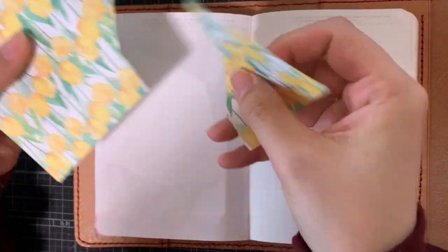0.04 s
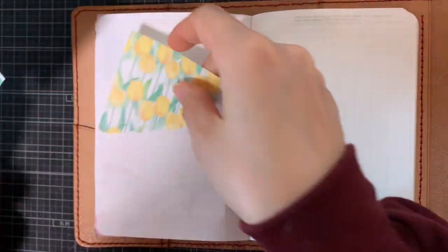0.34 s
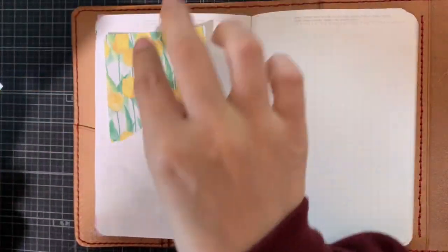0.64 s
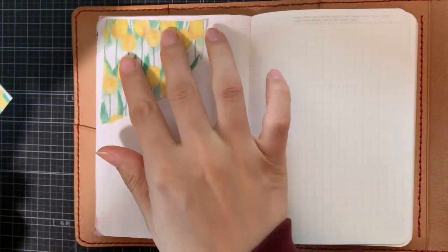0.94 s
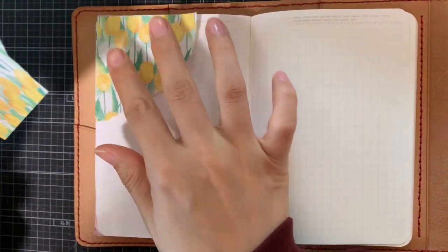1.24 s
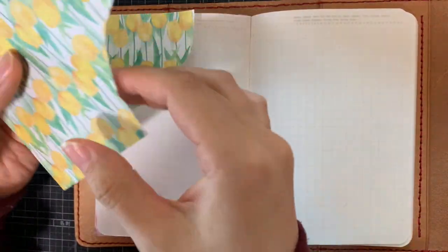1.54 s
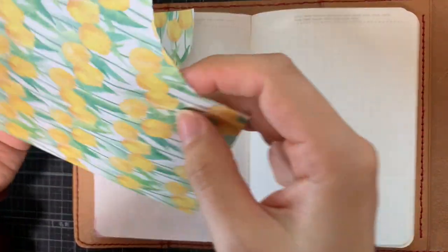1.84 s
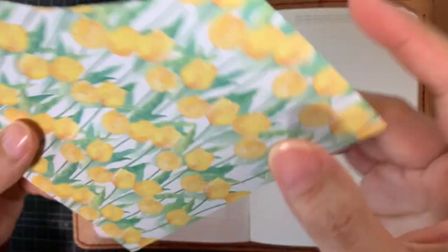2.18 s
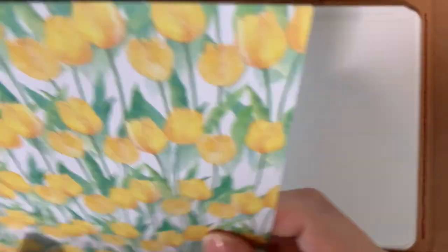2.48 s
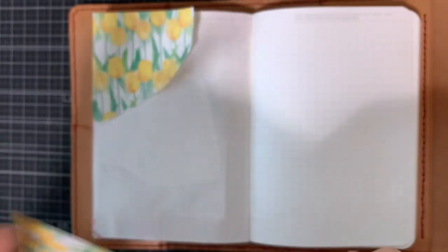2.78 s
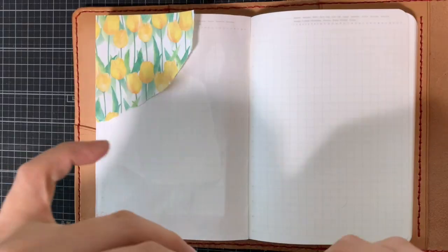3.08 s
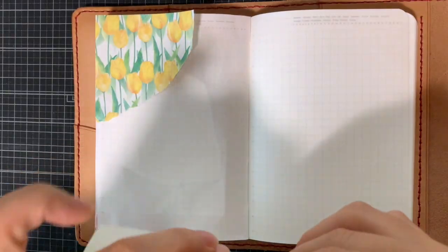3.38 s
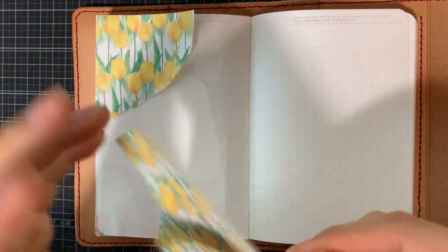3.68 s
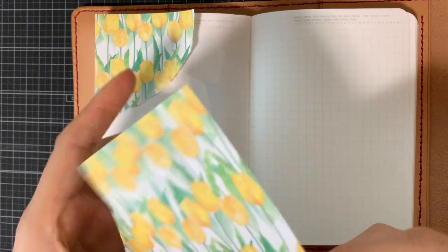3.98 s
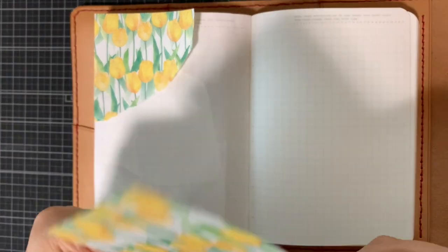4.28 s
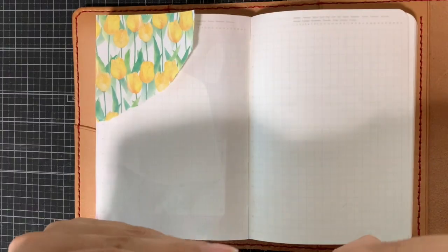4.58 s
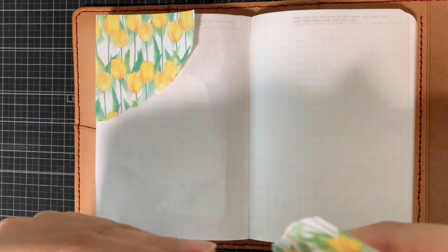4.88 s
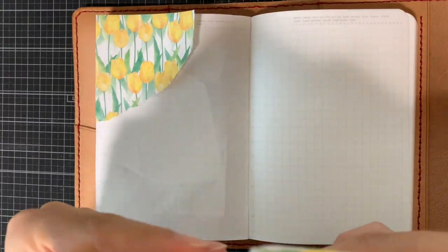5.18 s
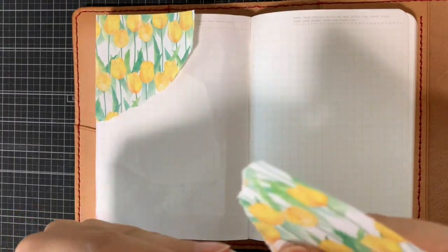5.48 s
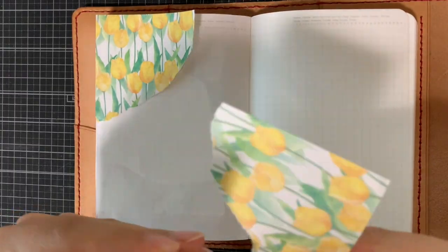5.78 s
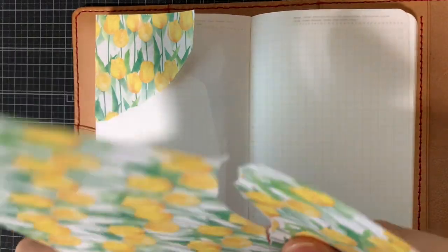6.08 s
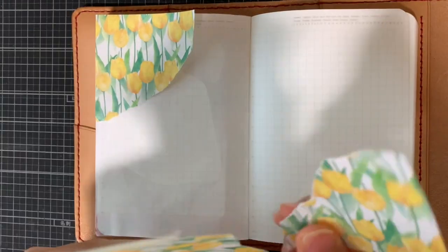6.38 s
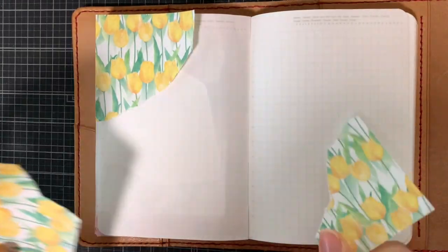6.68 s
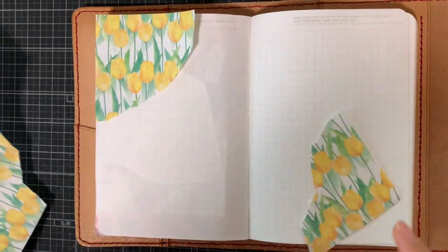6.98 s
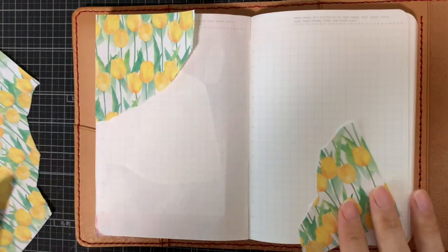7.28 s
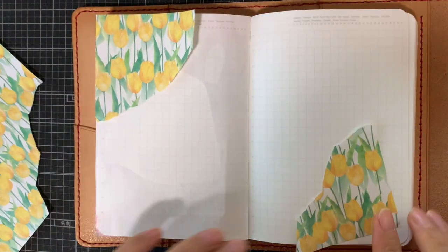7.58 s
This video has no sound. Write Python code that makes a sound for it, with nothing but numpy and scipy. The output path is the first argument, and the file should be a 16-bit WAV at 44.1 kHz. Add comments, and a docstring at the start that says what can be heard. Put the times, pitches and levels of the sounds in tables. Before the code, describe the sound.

Thin paper slides and crinkles under fingers, is dragged along, then torn in short pulls over a notebook in a quiet room.

```python
"""Thin paper is handled over an open notebook, close to a camera in a small, quiet room.
First fingers slide on the sheet, which ticks and pops as it buckles, and smooth a scrap onto the page.
From 2 s the sheet bends and flutters, with a dull bump; near 3.4 s it is dragged along and a hand
presses on the book. From 4.6 to 6.4 s it is torn in short pulls, its fibres breaking in clumps with
a few sharp snaps. Last, fingers smooth scraps down again and a hand bumps softly on the book."""
import sys
import numpy as np
from scipy import signal
from scipy.fft import rfft, irfft, next_fast_len
from scipy.io import wavfile
from scipy.ndimage import uniform_filter1d, map_coordinates

SR = 44100
rng = np.random.default_rng(int(sys.argv[2]) if len(sys.argv) > 2 else 0)


def wav_out(sig):
    """Save sig, one row per channel (or a flat mono array), as 16-bit PCM at SR to the path in sys.argv[1]."""
    wavfile.write(sys.argv[1], SR, np.round(np.clip(np.atleast_2d(sig).T, -1, 1) * 32767).astype(np.int16))


N = 341334
TIME = np.arange(N) / SR
FFT_SIZE = next_fast_len(N + SR // 8)
FFT_HZ = np.fft.rfftfreq(FFT_SIZE, 1 / SR) + 1
SPLIT_HZ, TOP_HZ = 7900, 15800  # where the lower and bright bands meet; where the treble ends


def amp(db):
    """Turn decibels into a gain."""
    return 10 ** (np.asarray(db) / 20)


def unit(x):
    """Scale to an average (rms) size of 1."""
    return x / np.sqrt(np.mean(x ** 2) + 1e-20)


def noise():
    """Two unrelated white noises."""
    return rng.standard_normal((2, N))


def wobble(rate):
    """A smooth curve through rate random points a second."""
    return map_coordinates(rng.standard_normal(int(N * rate / SR) + 4), [TIME * rate])


def colour(x, spectrum, band="all"):
    """Shape the tone by a table of relative levels, within the band "all", "lower" or "bright"."""
    size = 4096
    hz = np.fft.rfftfreq(size, 1 / SR) + 1
    f, db = np.transpose(spectrum)
    gain = amp(np.interp(np.log(hz), np.log(f), db)) / np.sqrt(1 + (f[0] / 2 / hz) ** 4)
    outside = {"all": hz / TOP_HZ, "lower": np.sqrt(hz / SPLIT_HZ),
               "bright": np.maximum(SPLIT_HZ / hz, hz / TOP_HZ)}[band]
    gain = gain / np.sqrt(1 + outside ** 40)
    # Make the filter ring after a click, never before it.
    cepstrum = irfft(np.log(np.maximum(gain, gain.max() * 1e-3)))[:size // 2]
    response = irfft(np.exp(rfft(2 * cepstrum, size)))
    return signal.fftconvolve(x, response[None] / np.linalg.norm(response))[:, :N]


def crackle(rate, spread_db, t60, attack):
    """Tiny breaks of random size, rate a second, each dying away by 60 dB in t60 seconds."""
    breaks = (rng.random(N) < rate / SR) * amp(spread_db * np.clip(rng.standard_normal(N), -2, 2))
    t = TIME[:SR // 12]
    fade = amp(-60 * t / t60) * (1 - np.exp(-t / attack))
    power = np.abs(signal.oaconvolve(breaks ** 2, fade ** 2)[:N])
    # The hand feeds in energy steadily, however unevenly it is let go.
    local_power = uniform_filter1d(power, size=1100) + power.mean() / 100
    return noise() * np.sqrt(power / local_power)


def friction(rate, spread_db, t60, hiss_db):
    """Fibres catch, on top of the even hiss of the finest ones."""
    catches = crackle(rate, spread_db, t60, attack=.0005)
    return unit(catches + amp(hiss_db) * noise())


def reshaping(x, depth_db, width=4):
    """As the sheet changes shape its tone drifts, in peaks and dips that last about 80 ms."""
    hz, _, spectra = signal.stft(x, SR, nperseg=512)
    drift = rng.standard_normal(spectra.shape[1:])
    for _ in range(2):  # blur across frequency, then time
        drift = uniform_filter1d(drift, size=width, axis=0)
        drift = uniform_filter1d(drift, size=14, axis=1)
    mobility = np.tanh(hz / 2400)[:, None]  # the lowest tones hardly move
    gain = amp(depth_db * mobility * np.clip(unit(drift), -2, 2))
    # A peak draws its energy from the frequencies beside it.
    gain /= np.sqrt(uniform_filter1d(gain ** 2, size=6 * width, axis=0))
    return signal.istft(spectra * gain, nperseg=512)[1][:, :N]


def effort(start, hold, rise, fall, swell_db=0):
    """One hand movement: up 30 dB in rise seconds, an arch while held, down 30 dB in fall seconds."""
    t = TIME - start
    flanks = np.maximum(-t, 0) / rise + np.maximum(t - hold, 0) / fall
    held = np.clip(t / hold, 0, 1)
    arch_db = 4 * (np.sin(np.pi * held) - 2 / np.pi)
    return amp(arch_db + swell_db * (held - .5) - 30 * np.minimum(flanks, 4))


def movements(rows, rise, fall):
    """The strength over time of several hand movements of one kind."""
    return sum(amp(db) * effort(s, hold, rise, fall) for s, hold, db in rows)


def stroke(fibres, rows, spectrum, rise, fall, swell_db=0):
    """The noise is heard in a lower band and a bright band, split near 8 kHz, each at its own level."""
    lower = sum(amp(db) * effort(s, hold, rise, fall, swell_db) for s, hold, db, _ in rows)
    bright = movements([(s, hold, db) for s, hold, _, db in rows], rise, fall)
    return colour(lower * fibres, spectrum, "lower") + colour(bright * fibres, spectrum, "bright")


def clicks(times, dbs, t60, attack, direct):
    """Bare clicks of strength direct, each followed by the sheet's brief, noisy ringing."""
    out, t = np.zeros((2, N + SR)), TIME[:SR // 12]
    for s, db in zip(times, dbs):
        ring = rng.standard_normal((2, len(t))) * amp(-60 * t / t60) * (1 - np.exp(-t / attack))
        ring /= np.linalg.norm(ring, axis=1, keepdims=True)
        ring[0, 0] += direct
        ring /= np.linalg.norm(ring, axis=1, keepdims=True)
        out[:, round(s * SR):][:, :len(t)] += amp(db) * np.sqrt(SR / 100) * ring  # level over 10 ms
    return out[:, :N]


# Tone of the room's background: f/Hz, level/dB
AIR_COLOUR = [(25, -3.5), (68, 3.5), (330, -5), (1050, -7), (1600, -4), (3000, -24), (15500, -27)]
def air():
    """The room gives a steady, low rush."""
    return amp(-64.5) * colour(noise(), AIR_COLOUR)


# Fingers slide on the held sheet: t/s, hold/s, lower level/dB, bright level/dB
SLIDES = [(0.0, 0.13, -60.5, -51), (0.136, 0.11, -53.5, -50), (0.296, 0.25, -53, -54),
          (0.753, 0.14, -63.5, -65.5), (1.623, 0.16, -59, -69.5), (1.757, 0.12, -55.5, -55),
          (1.907, 0.13, -58, -58.5), (2.064, 0.054, -53.5, -55.5), (2.343, 0.0081, -87, -61),
          (2.393, 0.058, -68, -57.5), (2.506, 0.22, -70.5, -54.5), (2.979, 0.22, -60.5, -66),
          (3.258, 0.091, -63.5, -61), (3.597, 0.16, -50, -67), (3.812, 0.0053, -53, -58.5),
          (3.935, 0.0026, -46.5, -47.5), (3.984, 0.029, -71, -60), (4.148, 0.071, -56.5, -57.5),
          (4.306, 0.11, -65.5, -68), (4.797, 0.016, -48.5, -44.5), (4.873, 0.44, -67.5, -70),
          (5.283, 0.063, -50.5, -64), (5.732, 0.012, -54, -39.5), (5.795, 0.031, -59, -56.5),
          (6.035, 0.071, -59, -58)]
# Tone of the sliding: f/Hz, level/dB
SLIDE_COLOUR = [(1000, 2.6), (2900, 9), (5000, 4.5), (6500, 6.75), (9000, 11.3), (15500, 4)]
# Fingers smooth a scrap onto the page: t/s, hold/s, level/dB
SMOOTHS = [(.57, 0.066, -67.5), (.775, 0.05, -59), (.97, 0.11, -60.5), (6.6, 0.23, -60.5), (7.0, 0.38, -55)]
# Tone of the smoothing: f/Hz, level/dB
SMOOTH_COLOUR = [(80.0, -4.5), (400.0, -11), (1000.0, -14), (1600.0, -4), (7000.0, -10), (15500.0, -15.5)]
def fingers():
    """Skin catches and slips on the loose sheet, and hisses more dully on paper lying on the book."""
    grip = amp(1.4 * wobble(rate=50))
    catches = grip * friction(rate=320, spread_db=7, t60=.004, hiss_db=2)
    hiss = np.sqrt(grip) * friction(rate=900, spread_db=6, t60=.006, hiss_db=4)
    slide = stroke(catches, SLIDES, SLIDE_COLOUR, rise=.017, fall=.041)
    smooth = colour(movements(SMOOTHS, rise=.25, fall=.17) * hiss, SMOOTH_COLOUR)
    return reshaping(slide + smooth, depth_db=2.6)


# Fibre bundles snap, edges and fingertips tick: t/s, lower level/dB, bright level/dB
SNAPS = [(0.033, -53.5, -45.5), (0.057, -43, -43.5), (.172, -51, -43.5), (0.196, -58, -50.5),
         (.217, -51, -49), (0.396, -52, -67), (0.462, -50.5, -48), (1.064, -55, -68), (3.606, -34.5, -58),
         (3.679, -45.5, -59), (3.705, -57, -64), (4.423, -57.5, -59), (4.578, -35, -36),
         (4.561, -46, -50.5), (4.642, -41.5, -24), (4.668, -42, -31), (4.716, -39, -34.5),
         (4.779, -37.5, -37), (5.109, -50.5, -53), (5.288, -37, -21.5), (5.365, -75, -45.5),
         (5.394, -61, -44), (5.408, -52.5, -39.5), (5.417, -65, -39.5), (5.431, -45.5, -31),
         (5.474, -43.5, -31), (5.582, -42.5, -25.5), (5.615, -39, -31), (6.086, -45.5, -45),
         (6.189, -57, -29.5), (6.405, -48, -29), (6.527, -58.5, -48), (6.32, -74, -54.5)]
# Tone of the snaps, and of the middle of the tear: f/Hz, level/dB
SNAP_COLOUR = [(130.0, -25.5), (400.0, -12), (850.0, -5.5), (2000.0, -9.5), (3000.0, -8.5), (7600.0, -11.5),
               (8200.0, -6.5), (13500.0, -8), (15500.0, -17)]
def snapping():
    """A snap is one sharp tick that rings a little longer in the lower band."""
    times, lower_db, bright_db = np.transpose(SNAPS)
    lower = clicks(times, lower_db, t60=.022, attack=.0008, direct=.35)
    bright = clicks(times, bright_db, t60=.015, attack=.0004, direct=1.3)
    return colour(lower, SNAP_COLOUR, "lower") + colour(bright, SNAP_COLOUR, "bright")


# The sheet buckles; a smaller or tighter piece sounds higher: t/s, level/dB, pitch factor
BUCKLES = [(0.059, -38, 1.32), (0.165, -47.5, 1.4), (1.457, -54, 0.99), (1.774, -41, 1.27),
           (2.104, -34, 1.24), (2.143, -45, 1.1), (2.181, -52, 1.15), (2.251, -53.5, 0.65),
           (2.402, -45, 1.11), (2.45, -48, 1.3), (2.484, -52, 0.69), (2.525, -42, 1.2),
           (2.545, -43.5, 1.37), (2.631, -57.5, 0.92), (3.189, -43.5, 1.6), (3.217, -36, 1.72),
           (3.966, -41.5, 1.6), (4.19, -38.5, 1.3), (4.885, -46, 0.93), (5.036, -48, 0.91),
           (5.836, -50, 1.48), (6.489, -53.5, 1.22)]
# Hollow tone of the sheet at pitch factor 1: f/Hz, level/dB
HOLLOW_COLOUR = [(120.0, -12), (580.0, -3.5), (840.0, 3.5), (1250.0, -4), (2400.0, -4.5), (3200.0, -12.5),
                 (8000.0, -41.5)]
def buckling():
    """Now and then the sheet pops, hollowly, into a new shape."""
    out = np.zeros((2, N + SR))
    for s, db, pitch in BUCKLES:
        click = clicks([0], [db], t60=.058, attack=.0035, direct=.15)[:, :SR // 12]
        pop = colour(click, [(hz * pitch, level) for hz, level in HOLLOW_COLOUR])
        out[:, round(s * SR):][:, :pop.shape[1]] += pop
    return out[:, :N]


# The sheet bends: t/s, hold/s, level/dB
BENDS = [(2.095, 0.11, -47.5), (2.355, 0.23, -53.5), (3.03, 0.13, -57.5), (3.6, 0.21, -55),
         (3.84, 0.42, -59), (4.8, 0.081, -56.5), (5.26, 0.12, -56), (5.78, 0.12, -56), (6.05, 0.041, -48),
         (6.59, 0.016, -56.5)]
def bending():
    """The bending sheet flutters softly between its pops, in a narrower form of their tone."""
    flutter = crackle(rate=150, spread_db=4.5, t60=.04, attack=.003)
    narrow_colour = [(hz, 1.62 * db) for hz, db in HOLLOW_COLOUR]
    return colour(movements(BENDS, rise=.058, fall=.0634) * flutter, narrow_colour)


# Dull bumps of hands, book and tight paper: t/s, f/Hz, level/dB
BUMPS = [(2.101, 159, -36.5), (3.578, 82, -31), (4.781, 500, -33.5), (7.111, 85.5, -43)]
def bumps(t60):
    """Each soft knock rings one low note that dies away quickly."""
    out, t = np.zeros(N + SR), TIME[:SR // 5]
    for s, hz, db in BUMPS:
        fade = amp(db - 60 * t / t60) * (1 - np.exp(-2 * hz * t))
        out[round(s * SR):][:len(t)] += fade * np.sin(2 * np.pi * hz * t)
    return out[:N]


# The sheet is dragged along: t/s, hold/s, lower level/dB, bright level/dB
DRAGS = [(3.376, 0.043, -35.5, -38), (3.489, 0.098, -31, -32.5)]
# Tone of the dragging: f/Hz, level/dB
DRAG_COLOUR = [(70.0, -7), (300.0, -15), (700.0, -5), (1800.0, -8.5), (2400.0, 2), (7500.0, -6),
               (8200.0, 5), (12000.0, 18.5), (15500.0, 12)]
def dragging():
    """Paper scraping along gives a dense, even rasp."""
    fibres = friction(rate=1400, spread_db=4.5, t60=.003, hiss_db=-4)
    fibres = reshaping(fibres, depth_db=5)
    return stroke(fibres, DRAGS, DRAG_COLOUR, rise=.021, fall=.065, swell_db=2.5)


# Hands press and shift on the book: t/s, hold/s, level/dB
PRESSES = [(3.6, 0.029, -49.5), (4.79, 0.031, -51.5), (7.06, 0.098, -65)]
# Tone of the pressing: f/Hz, level/dB
PRESS_COLOUR = [(70, -6), (125, -10.5), (400, -14), (1200, -44)]
def pressing():
    """The weight of a hand rubs dully and unevenly through the book."""
    rub = unit(amp(1.9 * wobble(rate=87)) * noise())
    return colour(movements(PRESSES, rise=.08, fall=.3) * rub, PRESS_COLOUR)


# Pulls that tear the sheet: t/s, hold/s, rise/s, lower level/dB, bright level/dB, stage of the tear
TEARS = [(4.618, 0.082, 0.07, -26, -25.5, "rip"), (5.423, 0.067, 0.089, -47.5, -39.5, "pull"),
         (5.542, 0.079, 0.0096, -35, -27.5, "pull"), (6.172, 0.072, 0.034, -44.5, -33.5, "parting"),
         (6.387, 0.013, 0.11, -40, -32.5, "parting")]
# Tone of the first rip: f/Hz, level/dB
RIP_COLOUR = [(80, -7), (210, -12), (420, -5), (690, -2), (1150, -4.5), (1700.0, -11.5), (2600.0, -2.5),
              (6500.0, -4.5), (7600.0, 0.5), (8200.0, -7), (15500.0, -14.5)]
# Tone as the scrap parts from the sheet: f/Hz, level/dB
PARTING_COLOUR = [(330.0, -17), (850.0, 9), (1700.0, -2.5), (5000.0, 2), (7500.0, -3.5), (9000.0, -10.5),
                  (11000.0, 0.5), (15500.0, -6)]
def tearing():
    """The tear jumps ahead, breaking clumps of fibres, and sounds thinner as the scrap comes free."""
    fibres = friction(rate=600, spread_db=5.7, t60=.005, hiss_db=-7)
    fibres = reshaping(fibres, depth_db=6)
    colours = {"rip": RIP_COLOUR, "pull": SNAP_COLOUR, "parting": PARTING_COLOUR}
    out = np.zeros((2, N))
    for s, hold, rise, lower_db, bright_db, stage in TEARS:
        pull = [(s, hold, lower_db, bright_db)]
        out += stroke(fibres, pull, colours[stage], rise, fall=.049, swell_db=7)
    return out


def room(x, t60, wet_db):
    """The desk and near walls add a short, weak echo that changes as the hands move."""
    t, hop = TIME[:SR // 4], SR // 8
    wet = np.zeros((2, N + SR))
    for start in range(0, N, hop):
        tail = rng.standard_normal((2, len(t))) * amp(-60 * t / t60) * (t > .004)
        tail /= np.linalg.norm(tail, axis=1, keepdims=True)
        echo = signal.fftconvolve(x[:, start:start + hop], tail, axes=1)
        wet[:, start:start + echo.shape[1]] += echo
    return x + amp(wet_db) * wet[:, :N]


# The microphone's two openings: f/Hz, likeness (0 to 1), head start of the right/rad
MIC_OPENINGS = [(130, 0.91, .05), (795, 0.52, 0.44), (1624, 0.36, 0.98), (2980, 0.65, 2.14),
                (4820, 0.42, 1.66), (9300, 0.7, 1.09), (12500, 1, .08)]
def microphone(pair):
    """Two unrelated signals become left and right: partly alike, the right a little early."""
    f, *columns = np.transpose(MIC_OPENINGS)
    alike, lead = [np.interp(np.log(FFT_HZ), np.log(f), column) for column in columns]
    turn = np.arccos(np.clip(alike, 0, 1)) / 2
    mid, side = rfft(pair, FFT_SIZE) * [np.cos(turn), np.sin(turn)]
    phase_shift = np.exp(.5j * np.array([-lead, lead]))
    return irfft(np.array([mid + side, mid - side]) * phase_shift, FFT_SIZE)[:, :N]


def scene():
    """All the paper sounds in the room, with the bumps in the centre."""
    paper = fingers() + snapping() + buckling() + bending() + dragging() + pressing() + tearing()
    return microphone(air() + room(paper, t60=.15, wet_db=-14)) + bumps(t60=.07)


def record(dry):
    """The camera loses the deepest bass and the very highest treble."""
    passband = 1 / np.sqrt((1 + (48 / FFT_HZ) ** 6) * (1 + (FFT_HZ / TOP_HZ) ** 300))
    return irfft(rfft(dry, FFT_SIZE) * passband, FFT_SIZE)[:, :N]


dry = scene()
out = record(dry)
wav_out(out)
```